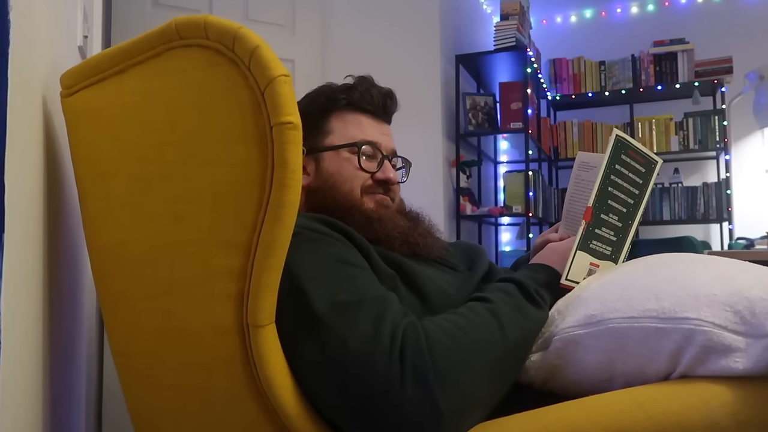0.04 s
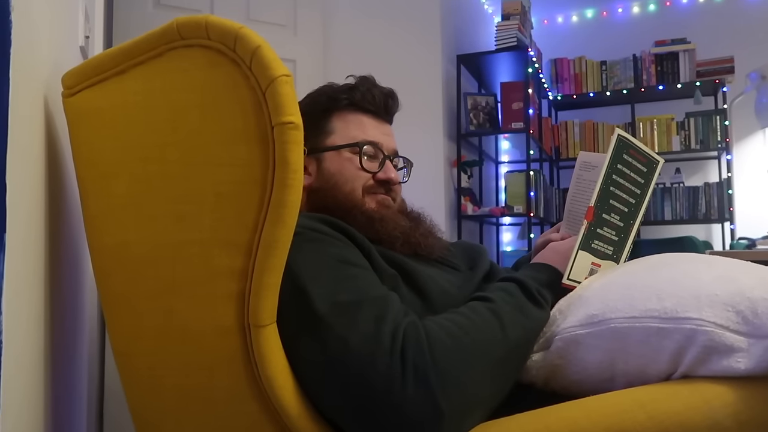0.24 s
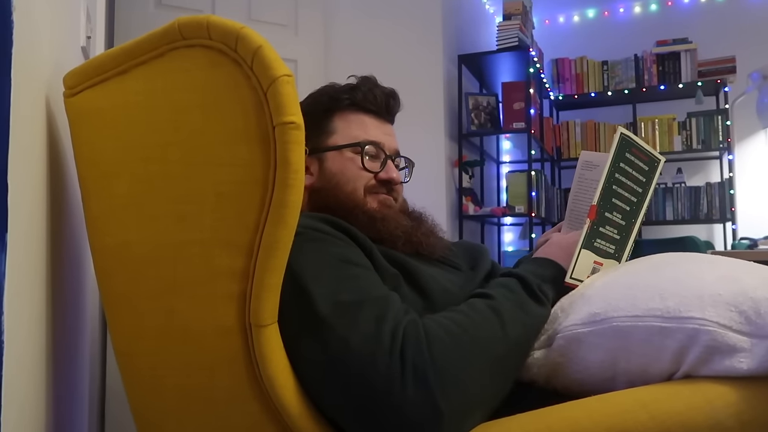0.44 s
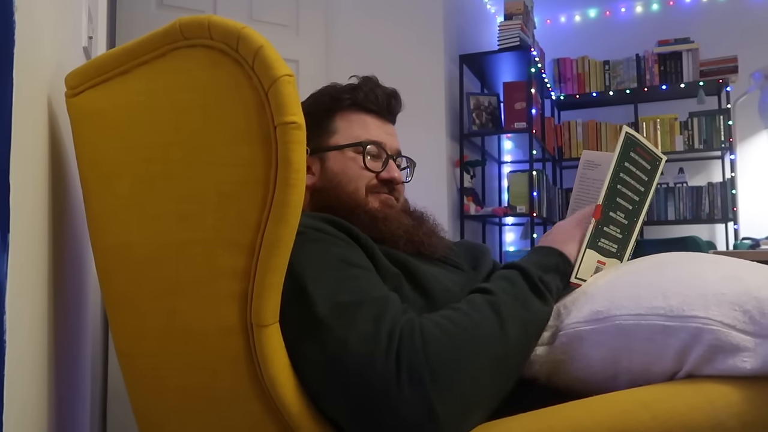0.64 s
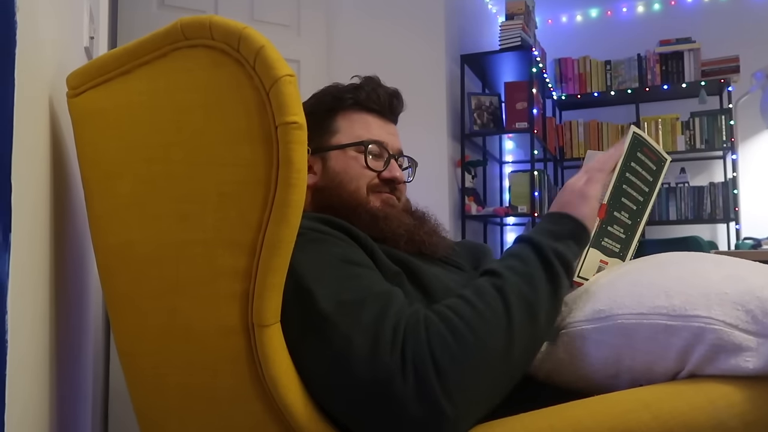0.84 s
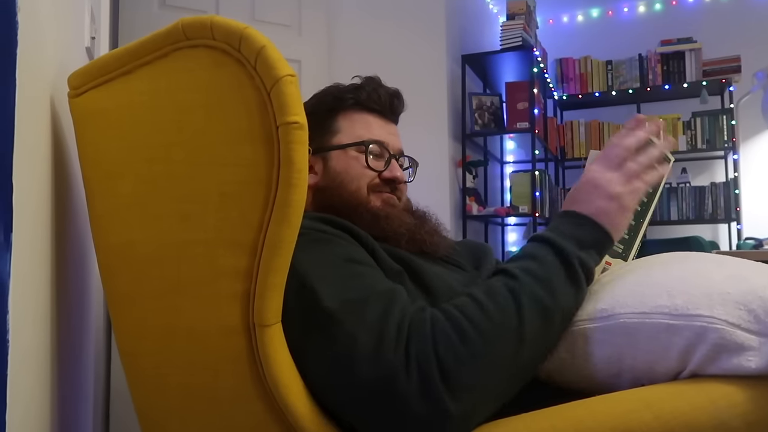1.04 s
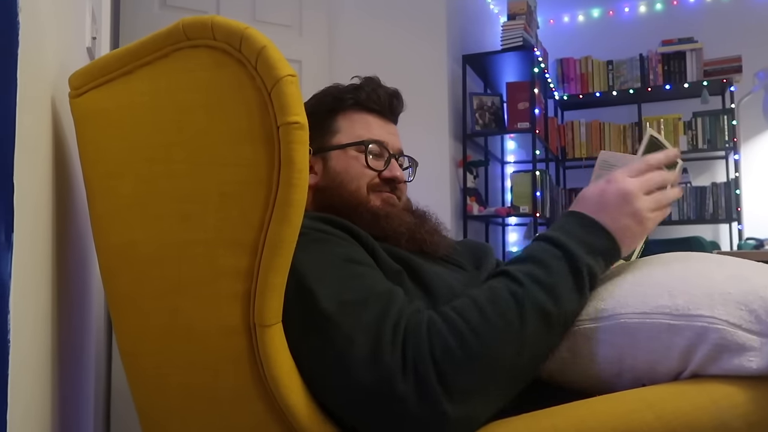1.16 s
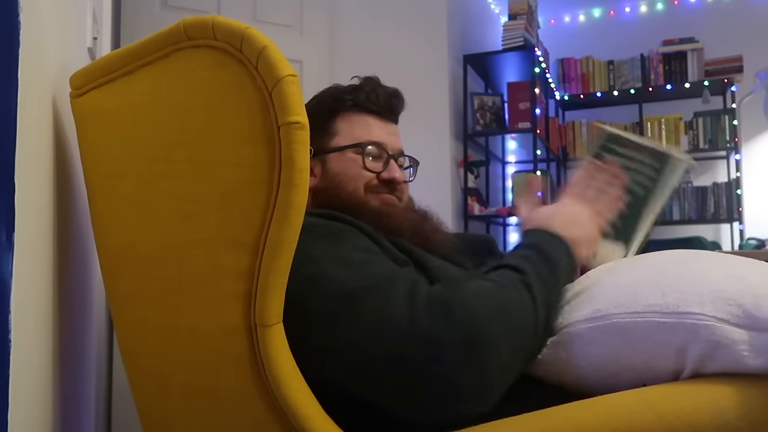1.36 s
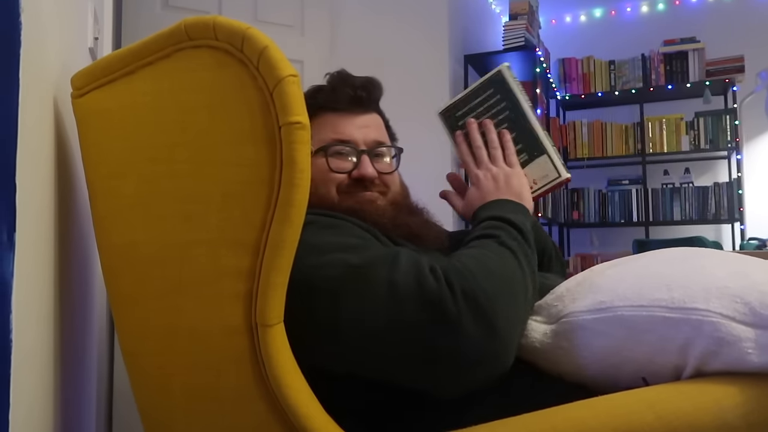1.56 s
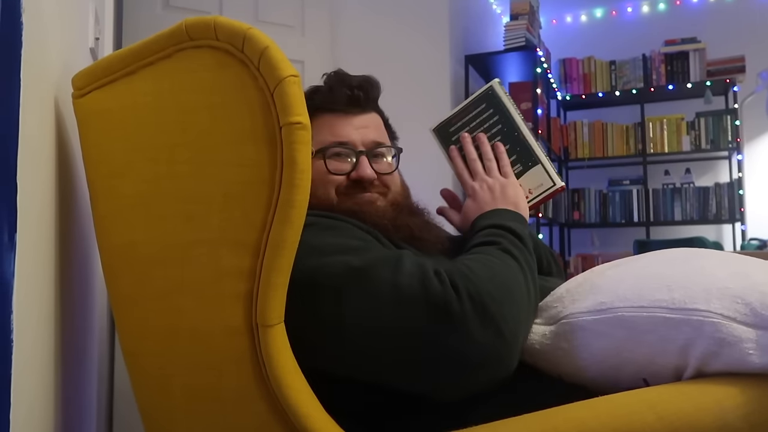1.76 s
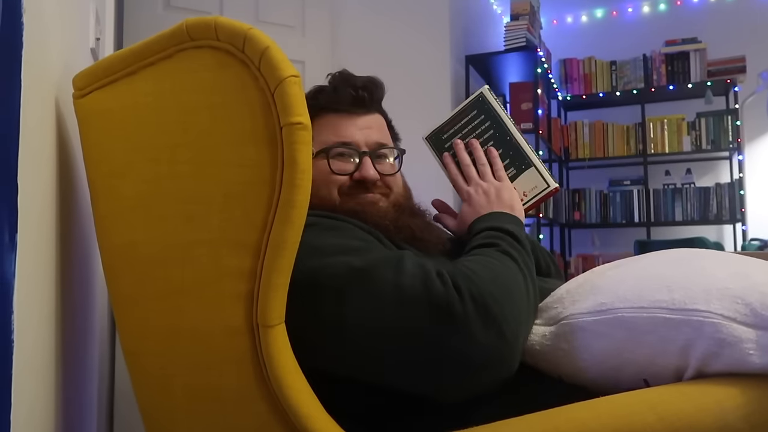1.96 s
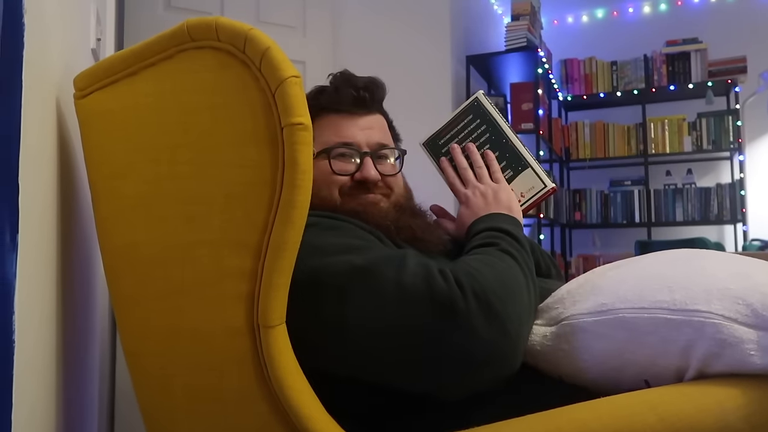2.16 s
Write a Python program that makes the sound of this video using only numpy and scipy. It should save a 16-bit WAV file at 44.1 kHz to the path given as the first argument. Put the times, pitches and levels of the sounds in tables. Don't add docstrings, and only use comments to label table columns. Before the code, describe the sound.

A thick paperback is clapped shut between two hands: faint cloth rustle and tiny page touches first, then one sharp crack with a low thump, and a short small-room tail, heard close and slightly overloaded.

```python
import sys
import numpy as np
from scipy import signal
from scipy.io import wavfile
from scipy.ndimage import uniform_filter1d

SR = 44100
rng = np.random.default_rng(int(sys.argv[2]) if len(sys.argv) > 2 else 0)


def persist_wave(psi):
    counts = np.round(np.clip(psi, -1, 1) * 32767).astype(np.int16)
    wavfile.write(sys.argv[1], SR, np.atleast_2d(counts).T)


def rack_gain(trim_db):
    fader = np.asarray(trim_db, float)
    return 10 ** (fader / 20)


N = 96711
T = np.arange(N) / SR
CLAP_S = 1.4264
PORT_LAG_S = 0.000036


def evened(x):
    return x / np.sqrt(np.mean(x ** 2) + 1e-20)


def read(points, hz):
    f, value = np.transpose(points)
    return np.interp(np.log(hz + 1), np.log(f + 1), value)


def late(x, delay_s):
    return np.interp(T - delay_s, T, x, left=0)


def resonate(x, hz, width_hz):
    turn = np.exp(2j * np.pi * hz * T)
    pole = np.exp(-np.pi * width_hz / SR)
    return 2 * (turn * signal.lfilter([1 - pole], [1, -pole], x / turn)).real


def ring(start_s, hz, t60_s, rise_s):
    t = np.maximum(T - start_s, 0)
    return -np.sin(2 * np.pi * hz * t) * rack_gain(-60 * t / t60_s) * (1 - np.exp(-t / rise_s))


def noise(same, size, patchy_db):
    hz = np.fft.rfftfreq(size, 1 / SR)
    a, b, c, d, patches = rng.standard_normal((4 * N // size + 5, len(hz), 5)).T
    patches = uniform_filter1d(patches, size=10, axis=0)
    patches = evened(uniform_filter1d(patches, size=10, axis=1))
    like = np.clip(read(same, hz), -1, 1)[:, None]
    left = a + 1j * b
    right = like * left + np.sqrt(1 - like ** 2) * (c + 1j * d)
    return hz, rack_gain(patchy_db * patches) * np.array([left, right])


def wave(z):
    size = 2 * z.shape[1] - 2
    return signal.istft(z, nperseg=size, noverlap=3 * size // 4)[1][:, :N]


# (delay after clap [s], level [dB])
SLAPS = [
    (-.0003, -4.5),
    (.0002, -0.5),
    (.0005, 5),
    (.0009, -11.5),
    (.0014, -1),
    (.0018, -7.5),
]
# (frequency [Hz], width [Hz], level [dB])
COVER = [(776, 260, -3.5), (1920, 490, 6), (3220, 470, 1.5), (4805, 190, -14), (6130, 580, -14.5),
         (9070, 430, -20), (10100, 220, -23.5), (11500, 640, -32)]
CRACK_DB, CRACK_GRIT_DB, COVER_DAMPING = 8.5, -9, 1.6


def crack():
    slaps = np.zeros(N)
    grit = rng.standard_normal(N)
    for k, (delay_s, db) in enumerate(SLAPS):
        t = T - CLAP_S - delay_s
        click = (-1) ** k * np.sinc(t * SR)
        scrape = grit * (t > 0) * np.exp(-abs(t) / 0.0002)
        slaps += rack_gain(db) * (click + rack_gain(CRACK_GRIT_DB) * scrape)
    colour = sum(rack_gain(db) * resonate(slaps, hz, width_hz * COVER_DAMPING) for hz, width_hz, db in COVER)
    return rack_gain(CRACK_DB) * colour / abs(colour).max()


# (frequency [Hz], level [dB], t60 [s])
BLOCK = [(165, -9.5, 0.14), (248.5, 1.5, 0.038), (275.6, 7.5, .028), (310, 2, 0.032), (377, -7.5, 0.045),
         (380, -11.5, 0.051), (665.7, -6, 0.036), (800, -11, 0.043), (940, -15.5, 0.033)]
BLOCK_DB, BLOCK_RISE_S, BLOCK_LAG_S = 1, 0.002, 0.00059


def thump():
    start_s = CLAP_S + BLOCK_LAG_S
    return rack_gain(BLOCK_DB) * sum(rack_gain(db) * ring(start_s, hz, t60_s, BLOCK_RISE_S) for hz, db, t60_s in BLOCK)


AIR_DB, AIR_RISE_S, AIR_FALL_S = -13.5, 0.0018, 0.0022
AIR_HZ, AIR_WIDTH_HZ = 5680, 2000


def air():
    hiss = []
    for v in rng.standard_normal((2, N)):
        jet = resonate(resonate(v, AIR_HZ, AIR_WIDTH_HZ), AIR_HZ, AIR_WIDTH_HZ)
        hiss.append(evened(jet) + 0.25 * v)
    t = T - CLAP_S
    swell = np.exp(np.where(t < 0, t / AIR_RISE_S, -t / AIR_FALL_S))
    return rack_gain(AIR_DB) * np.array(hiss) * swell


# (time [s], thump level [dB], tick level [dB], pitch [Hz])
TOUCHES = [(0.769, -43, -54, 503), (.783, -38.5, -47.5, 653), (.806, -38, -56, 293),
           (1.3617, -39, -42, 800), (1.381, -41, -52, 607), (1.371, -27, -58, 200),
           (1.3918, -53, -32.5, 490.2), (1.399, -54.5, -38, 502), (1.403, -18, -47, 260),
           (1.409, -19.5, -47, 420), (1.418, -24.5, -37.5, 295.2)]
TOUCH_T60_S, TOUCH_RISE_S, TICK_S = 0.022, 0.00042, 0.00092


def touches():
    grit = rng.standard_normal((2, N))
    grit = grit + grit[::-1] * 0.6
    grit = evened(np.array([resonate(resonate(v, 3500, 4600), 3200, 4600) for v in grit]))
    out = np.zeros((2, N))
    for start_s, thump_db, tick_db, hz in TOUCHES:
        t = T - start_s
        out += rack_gain(thump_db) * ring(start_s, hz, TOUCH_T60_S, TOUCH_RISE_S)
        out += rack_gain(tick_db) * grit * (t > 0) * np.exp(-abs(t) / TICK_S)
    return out


# (time [s], level [dB])
SLEEVE = [
    (0, -76),
    (.5, -64.5),
    (.65, -60.5),
    (.8, -55.5),
    (.92, -57),
    (1.1, -64),
    (1.28, -64),
    (1.38, -52),
    (1.42, -44.5),
]
# (frequency [Hz], density [dB per Hz])
CLOTH = [(150, -24), (500, -6), (1500, -3), (3500, -3), (7000, -7), (10500, -15), (14000, -30.5)]


def sleeves():
    hz, z = noise(ROOM_SAME, size=256, patchy_db=-1.5)
    flicker = rack_gain(0.8 * rng.exponential(1, z.shape[2]))
    level = rack_gain(np.interp(T, *np.transpose(SLEEVE))) * (T < CLAP_S)
    return level * evened(wave(z * flicker * rack_gain(read(CLOTH, hz))[:, None]))


# (delay [s], thump level [dB], crack level [dB])
ECHOES = [
    (.0045, -19.5, -17.5),
    (.0095, -15.5, -16.5),
    (.0135, -18, -25.5),
    (.029, -8, -32.5),
    (.048, -19.5, -39),
    (.08, -19.5, -45.5),
]
# (frequency [Hz], density [dB per Hz])
TAIL = [(60, -39), (150, -8.5), (280, -2), (430, -10.5), (600, -18), (1100, -21.5), (6000, -29.5),
        (14000, -48.5)]
# (frequency [Hz], t60 [s])
ROOM = [(100, 0.067), (260, 0.4), (700, 0.4), (1840, .3), (4850, 0.32), (8000, 0.3), (12800, .1)]
# (frequency [Hz], correlation [-1..1])
ROOM_SAME = [(100, .999), (500, 0.99), (1500, .94), (2800, .88), (4500, -0.047), (12000, 0.39)]
TAIL_DB, TAIL_RISE_S = -12, 0.0048


def room(low, high):
    hz, z = noise(ROOM_SAME, size=512, patchy_db=0.5)
    frame_t = np.maximum(np.arange(z.shape[2]) * 128 / SR - CLAP_S, 0)
    steady = z * rack_gain(read(TAIL, hz))[:, None]
    decay = rack_gain(-60 * frame_t / read(ROOM, hz)[:, None])
    tail = wave(steady * decay) / np.std(wave(steady))
    t = np.maximum(T - CLAP_S, 0)
    out = rack_gain(TAIL_DB) * tail * (1 - np.exp(-(t / TAIL_RISE_S) ** 2))
    for k, (delay_s, low_db, high_db) in enumerate(ECHOES):
        echo = rack_gain(low_db) * low + rack_gain(high_db) * high
        skew_s = (-1) ** k * 1.3 * PORT_LAG_S
        out += np.array([late(echo, delay_s), late(echo, delay_s + skew_s)])
    return out


# (frequency [Hz], density [dB per Hz])
HUSH = [(53, -30), (90, -5.5), (294, -7), (350, -8), (389, -7.5), (3510, -22), (13300, -47.5), (15500, -53)]
# (frequency [Hz], density [dB per Hz])
RUMBLE = [(12, -4), (28, -1), (40, 1), (50, 3), (62, -6.5), (85, -7.5), (120, -38.5)]
# (frequency [Hz], correlation [-1..1])
HUSH_SAME = [(60, 1), (180, 0.77), (550, -0.35), (1650, -0.23), (4970, 0.052), (15000, -0.28)]
HUSH_DB, RUMBLE_DB, WHINE_DB, WHINE_HZ = -53.5, -58, -93, 13000


def hush():
    hz, z = noise(HUSH_SAME, size=2048, patchy_db=1.5)
    whine = evened(np.array([resonate(v, WHINE_HZ, 40) for v in rng.standard_normal((2, N))]))
    hiss = evened(wave(z * rack_gain(read(HUSH, hz))[:, None]))
    rumble = evened(wave(z * rack_gain(read(RUMBLE, hz))[:, None]))
    return rack_gain(HUSH_DB) * hiss + rack_gain(RUMBLE_DB) * rumble + rack_gain(WHINE_DB) * whine


MIC_TOP_HZ = 9300


def scene():
    low, high = thump(), crack()
    dull = signal.butter(2, MIC_TOP_HZ, fs=SR)
    direct = np.array([late(low + high, PORT_LAG_S), late(low + high, 0.00001)])
    near = signal.lfilter(*dull, direct + air() + touches())
    return near + room(low, signal.lfilter(*dull, high)) + sleeves() + hush()


def band_limit(x):
    return signal.sosfilt(signal.butter(12, 15890, fs=SR, output="sos"), x)


DUCK_DB, DUCK_FALL_S, HOLD_S, RECOVER_DB_PER_S = -8.5, 0.021, 0.33, 11


def record(dry):
    t = np.maximum(T - CLAP_S, 0)
    duck_db = DUCK_DB * (1 - np.exp(-t / DUCK_FALL_S))
    recovery_db = RECOVER_DB_PER_S * np.maximum(t - HOLD_S, 0)
    gain_db = np.minimum(duck_db + recovery_db, 0)
    mix = np.clip(dry * rack_gain(gain_db), -1, 1)
    return band_limit(mix)


dry = scene()
out = record(dry)
persist_wave(out)
```